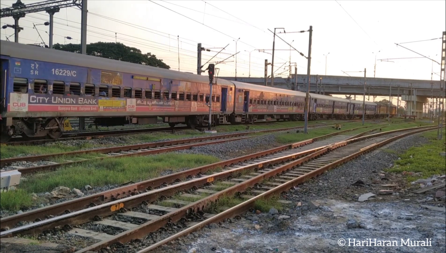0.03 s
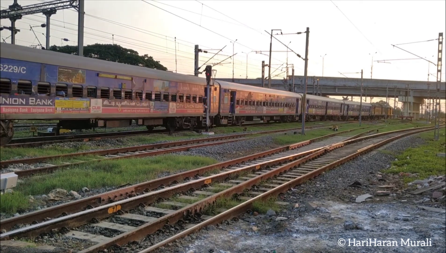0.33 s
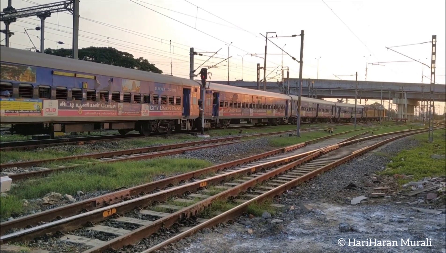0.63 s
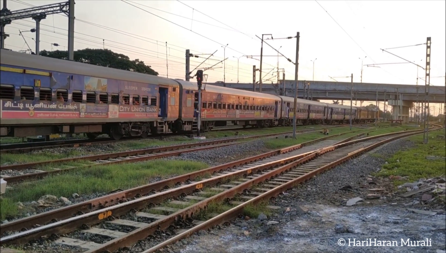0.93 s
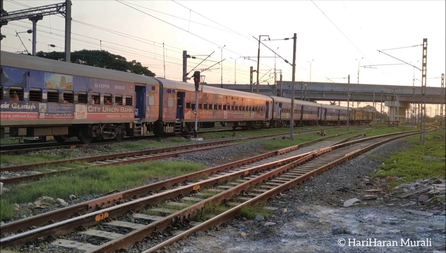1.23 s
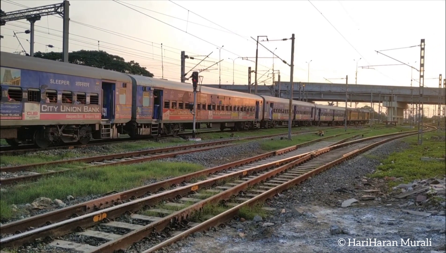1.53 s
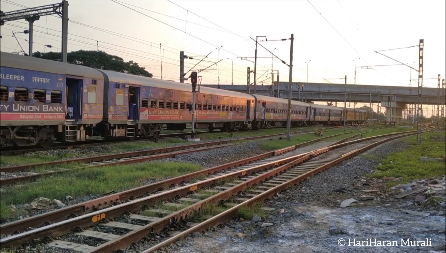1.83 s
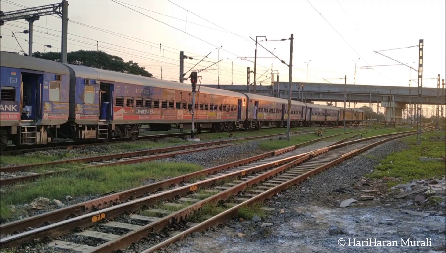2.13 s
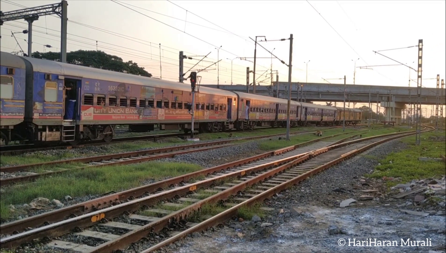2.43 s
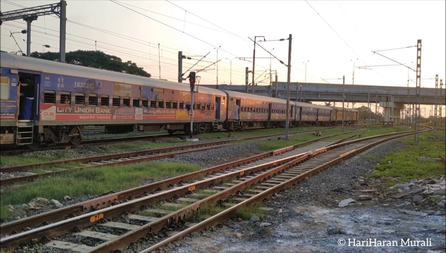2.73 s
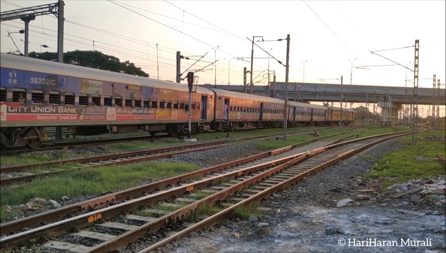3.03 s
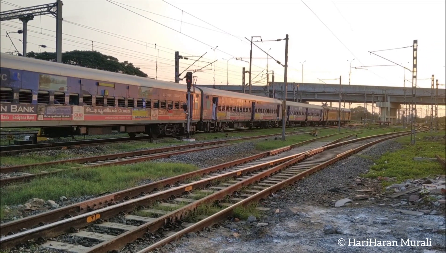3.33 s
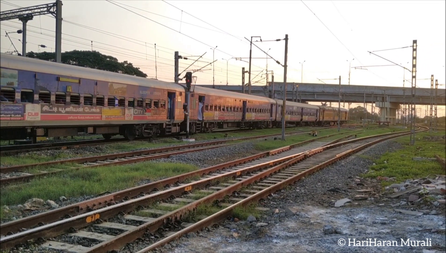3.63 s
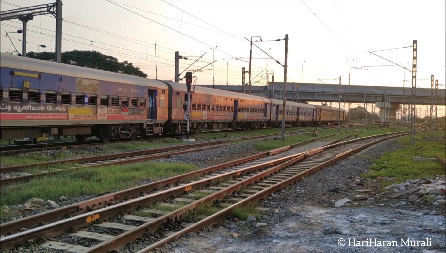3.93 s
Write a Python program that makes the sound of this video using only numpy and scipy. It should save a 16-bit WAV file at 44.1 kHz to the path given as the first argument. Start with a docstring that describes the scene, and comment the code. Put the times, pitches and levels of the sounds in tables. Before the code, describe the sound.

Train coaches rumble slowly through curved track outdoors, close by and slightly left. Irregular ringing clacks and short steel scrapes run through the low rolling noise, while a thin wheel squeal swells and fades three times.

```python
"""In a rail yard, passenger coaches roll slowly through curved points, a few metres to the left. The bogies
(the wheeled frames under each coach) rumble, and the coach bodies boom. Wheels clack over the rail joints and
strike the crossings of the points, which sets their steel ringing. As each bogie passes, its flanges (the
wheels' guiding lips) grind on the rail, and single wheel modes (the notes a wheel naturally rings at) swell
into a squeal."""
import sys
import numpy as np
from scipy import signal
from scipy.fft import rfft, irfft
from scipy.io import wavfile
from scipy.ndimage import uniform_filter1d

SR = 44100
rng = np.random.default_rng(int(sys.argv[2]) if len(sys.argv) > 2 else 0)


def pcm_store(signal):
    """Save signal as 16-bit PCM."""
    levels = np.round(np.clip(np.atleast_2d(signal), -1, 1) * 32767)
    wavfile.write(sys.argv[1], SR, levels.astype(np.int16).T)


N = 176400
T, HZ = np.arange(N) / SR, np.fft.rfftfreq(N, 1 / SR)

# How loud the rolling is (time [s], rumble [dB], roar [dB], rim ring [dB])
ROLLING_LEVELS = [(0, -22, -32.5, -28.5), (.25, -28.5, -35.5, -29.5), (.45, -22.5, -32, -34.5),
                  (1.05, -22, -26, -28), (1.24, -25, -32, -35), (1.4, -24, -28.5, -28),
                  (1.85, -25, -29, -28), (2.1, -23, -30.5, -34), (2.28, -29.5, -36, -41.5),
                  (2.55, -28, -30, -31.5), (2.85, -26.5, -31.5, -34), (3.03, -22.5, -29, -29),
                  (3.15, -25.5, -34.5, -42.5), (3.42, -24, -33.5, -32.5), (3.56, -24, -34.5, -38),
                  (3.68, -22.5, -30, -32.5), (4, -25.5, -32, -32.5)]
# Tone colour of the bogies' rumble (frequency [Hz], level [dB])
RUMBLE_COLOUR = [(10, -11), (30, 2), (45, -2), (75, -1), (120, -3), (180, -6), (245, -2.5), (320, -11.5),
                 (500, -18.5), (1500, -47)]
# Tone colour of the rails' roar (frequency [Hz], level [dB])
ROAR_COLOUR = [(100, -35), (350, -3), (600, -5.5), (950, -3.5), (1400, -9.5), (1560, -5), (2000, -18),
               (3300, -7), (4200, -15), (6000, -20), (12000, -28.5), (16000, -55)]
# Notes of a wheel rim (frequency [Hz], width [Hz], rolling [dB], struck [dB], time to fade 60 dB [s])
RIM_MODES = [(1782, 101, -0.5, -10, 0.28), (2120, 76, -5.5, -9.5, .22), (2345, 100, -4, -6, 0.59),
             (2601, 76, -5.5, -5, 0.19)]
# Coach bodies resonating (peak time [s], half length [s], frequency [Hz], width [Hz], level [dB])
BODY_BOOMS = [(1.37, 0.24, 30, 6.9, -25.5), (.58, 0.25, 261, 31, -26), (.8, 0.24, 350, 90, -34),
              (.993, 0.011, 235, 13.5, -14), (1.567, 0.12, 243, 23, -31.5), (3.355, 0.016, 198, 22, -20)]
# Wheels hitting rail joints and the crossings of the points (time [s], thud [dB], clatter [dB], ring [dB], rise
# [s], leading note [Hz])
WHEEL_HITS = [(.308, -17.5, -26.5, -27, 0.0034, 2200), (.325, -38, -32, -21.5, .012, 2355),
              (.56, -25, -28.5, -39, .0044, 2330), (.576, -22.5, -21.5, -28, .001, 1825),
              (.725, -22.5, -23.5, -18.5, .0011, 2600), (.795, -21.5, -39, -31, .0042, 2370),
              (.883, -21, -26.5, -27, 0.0065, 2200), (.975, -21.5, -24, -36, 0.0072, 1830),
              (1.046, -22, -24.5, -22, 0.00092, 2611), (1.125, -20, -26, -34, 0.0085, 2340),
              (1.289, -19.5, -25, -29, .0056, 1780), (1.46, -19.5, -28, -29.5, 0.011, 2116),
              (1.705, -20, -26, -37, 0.0095, 1750), (2.118, -21, -23.5, -30, 0.0078, 2340),
              (2.442, -17, -19, -28, .001, 2540), (2.606, -21.5, -23.5, -19.5, 0.0016, 2589),
              (2.772, -19, -34, -35, .004, 2590), (2.929, -24, -25.5, -24, 0.005, 2600),
              (3.342, -21, -33, -33, 0.012, 2120), (3.607, -16.5, -22, -27.5, 0.011, 1785),
              (3.771, -18.5, -22.5, -19.5, .001, 2643), (3.84, -18.5, -33, -41, 0.007, 2340),
              (3.925, -18.5, -23, -35, .016, 2100), (3.957, -24, -24, -24, .008, 2310)]
# Tone colour of a hit's low thud (frequency [Hz], level [dB])
THUD_COLOUR = [(25, -3.5), (70, 0.5), (130, -2), (220, 0), (300, -11.5), (450, -25), (1200, -54)]
# Tone colour of a hit's clatter (frequency [Hz], level [dB])
CLATTER_COLOUR = [(120, -26), (330, 3), (550, -2.5), (900, -3), (1400, -10), (2400, -14), (3800, -13.5),
                  (6000, -23.5), (15000, -40)]
# Hollow knock of the bogie frame (frequency [Hz], level [dB], time to fade 60 dB [s])
FRAME_MODES = [(356, -3.5, .09), (451, -4.5, 0.064), (600, -2.5, 0.053), (686, -4, 0.073),
               (934, -11, 0.053)]
# Grinding as the flanges press on the rail (time [s], level [dB])
GRIND_LEVELS = [(0, -18.5), (.29, -21), (.53, -35), (.7, -40.5), (.95, -34), (1.21, -31), (1.44, -22),
                (1.85, -20.5), (2.08, -30.5), (2.33, -42.5), (2.45, -40), (2.62, -29), (2.78, -28.5),
                (2.96, -25), (3.2, -39), (3.55, -48.5), (4, -48)]
# Tone colour of the grinding (frequency [Hz], level [dB])
GRINDING_COLOUR = [(1500, -11.5), (3000, -5.5), (3560, 2), (4540, 1.5), (5400, 1), (6500, 3), (7500, 0.5),
                   (9500, 0), (11500, -1), (12750, 3), (14000, -5), (15500, -11)]
# Quiet notches in the grinding's treble (frequency [Hz], width [Hz], depth [dB])
GRIND_NOTCHES = [(3080, 230, -1), (4183, 250, -20), (4930, 236, -18), (5830, 156, -21), (8080, 220, -16),
                 (13400, 200, -5)]
# Brief flange scrapes as the bogies jolt (peak time [s], half length [s], level [dB])
FLANGE_SCRAPES = [(0.598, 0.029, -29.5), (0.735, .02, -33), (0.8, .03, -32.5), (0.935, 0.028, -26.5),
                  (1.053, .025, -30), (1.163, 0.023, -24), (2.5, 0.046, -32), (2.6, .03, -34),
                  (3.05, 0.031, -27.5), (3.374, .034, -30), (3.444, 0.041, -33.5), (3.642, 0.04, -31.5),
                  (3.849, .027, -31.5), (3.978, .037, -29.5)]
# Tone colour of a scrape (frequency [Hz], level [dB])
SCRAPE_COLOUR = [(1200, -20), (2800, 7), (4800, -5), (6500, 2), (9800, -1.5), (11500, -10), (13000, -11),
                 (15500, -22)]
# Low rim modes singing (peak time [s], half length [s], frequency [Hz], width [Hz], level [dB])
RIM_SINGING = [(.6, 0.3, 2337, 41, -33.5), (1.55, .055, 2116, 21, -30), (1.87, 0.049, 2116, 25, -29.5),
               (2.42, 0.12, 2540, 50, -38), (3.62, 0.22, 2100, 25, -34.5), (2.92, .05, 1770, 50, -30),
               (3.8, 0.038, 2342, 18, -26.5)]
# High wheel modes squealing (peak time [s], half length [s], frequency [Hz], width [Hz], level [dB])
WHEEL_SQUEALS = [(.14, 0.21, 4530, 66, -25), (0.056, 0.13, 5459, 31, -33.5), (0.1, 0.16, 6557, 13, -28),
                 (0.19, .15, 6350, 70, -34), (0.16, .18, 7500, 40, -38), (0.14, .21, 9464, 16, -31.5),
                 (1.71, .21, 5555, 5.3, -27), (1.78, 0.21, 5490, 49, -29.5), (1.927, 0.17, 6412, 7, -24.5),
                 (1.77, 0.22, 6494, 17, -27.5), (1.75, .2, 4565, 50, -36), (1.63, 0.21, 9426, 15, -31.5),
                 (1.83, 0.23, 10411, 8.7, -35), (1.67, 0.21, 10697, 8, -34), (1.65, .22, 10621, 12, -32.5),
                 (2.95, 0.065, 4570, 49, -33.5), (3.1, .045, 4490, 39, -28.5), (3.08, 0.048, 5426, 39, -31)]
# How alike the two microphones sound (frequency [Hz], likeness [about 1 = same])
MIC_LIKENESS = [(250, 1.16), (500, 0.7), (1000, 0.49), (2400, 0.54), (5000, 0.49), (9000, 0.02)]
# How much louder the left microphone is (frequency [Hz], level [dB])
LEFT_BOOST = [(50, -.5), (1200, 1), (2600, -1), (5400, 4.5), (6200, 3), (7100, 7), (8000, 3.5),
              (10300, 6.5), (11300, 4), (15000, -2)]
# How far the left microphone's wave lags (frequency [Hz], phase [radians])
LEFT_PHASE_LAG = [(40, 0), (450, 0.56), (1100, 1.84), (1400, 3.5), (2150, 6), (2650, 6.5), (4550, 12.5),
                  (5550, 19), (6250, 19), (8100, 28), (10700, 31.5)]

PATCH_DB, PATCH_HZ, PATCH_S = 3, 400, .05  # depth, width and length of the contact patches
JOLT_DB, JOLT_HZ = 1, 22
FLUTTER_DB, FLUTTER_HZ = 2.5, 25
CHATTER_DB, CHATTER_HZ = 0.97, 45
LEAD_DB, LEAD_T60_S = -1, .52  # a hit's leading note; T60 is the time to fade by 60 dB
KNOCK_FROM_DB, KNOCK_GROWTH = -22, 1.5  # knock matches clatter here, and changes 1.5 dB per dB of it
SLIP_LIMIT = 0.67  # a driven mode starts to level off at this share of its average strength


def amp(db):
    """Turns decibels into a gain to multiply by."""
    return np.exp(np.asarray(db) * (np.log(10) / 20))


def unit(x):
    """Scales a signal to an average strength (rms) of 1."""
    return x / np.sqrt(np.mean(abs(x) ** 2) + 1e-20)


def curve(points):
    """Joins a table's points into a value for every frequency."""
    hz, value = np.transpose(points)
    return np.interp(np.log(HZ + 1), np.log(hz + 1), value)


def level(table, column=1):
    """Gain over time from one dB column."""
    rows = np.array(table)
    return amp(np.interp(T, rows[:, 0], rows[:, column]))


def wobble(depth_db, rate_hz):
    """A gain that drifts smoothly up and down at random."""
    drift = irfft(rfft(rng.standard_normal(N)) / (1 + (HZ / rate_hz) ** 2), N)
    return amp(depth_db * unit(drift))


def hump(hz, width_hz):
    """A resonance: lets through the frequencies near one note."""
    return 1 / (1 + ((HZ - hz) / (np.pi / 4 * width_hz)) ** 2)


def swell(peak_s, half_s, rise_share=1):
    """A rounded rise and fall, 5 dB down one half length after the peak."""
    away = np.maximum((peak_s - T) / rise_share, T - peak_s) / half_s
    return np.where(away < 4, amp(-5 * away ** 2.12), 0)


def stereo_spectrum():
    """Spectrum of white noise as the two microphones hear it."""
    shared, separate = rfft(rng.standard_normal((2, N)))
    likeness = np.clip(curve(MIC_LIKENESS), 0, .985)
    side = amp(curve(LEFT_BOOST) / 2)
    left = shared * side * np.exp(-1j * curve(LEFT_PHASE_LAG))
    right = (likeness * shared + np.sqrt(1 - likeness ** 2) * separate) / side
    return np.array([left, right])


def noise(gains):
    """Stereo noise shaped by a gain for each frequency."""
    return unit(irfft(stereo_spectrum() * gains, N))


def coloured(colour):
    """Stereo noise with the tone colour of a table."""
    return noise(amp(curve(colour)))


def patchy(sound):
    """Uneven contact makes patches of the spectrum come and go."""
    spectra = signal.stft(sound, nperseg=512)[2]
    frames, bins = round(PATCH_S * SR / 256), round(PATCH_HZ * 512 / SR)
    patches = uniform_filter1d(rng.standard_normal(spectra.shape[1:]), bins, 0)
    patches = unit(uniform_filter1d(patches, frames, 1))
    return unit(signal.istft(spectra * amp(PATCH_DB * patches))[1][:, :N])


def resonances(table):
    """Single modes swell while driven, level off, and flutter with the uneven contact."""
    out, drive = np.zeros((2, N)), stereo_spectrum()
    for peak_s, half_s, hz, width, db in table:
        mode = unit(np.fft.ifft(drive * hump(hz, width), N))
        power = np.mean(abs(mode) ** 2, axis=0)
        tone = mode.real / np.sqrt(power + SLIP_LIMIT ** 2) * wobble(FLUTTER_DB, FLUTTER_HZ)
        shape = swell(peak_s, half_s)
        out += amp(db) * np.sqrt(np.mean(shape ** 2)) * unit(shape * tone)
    return out


def rolling():
    """Bogies rumble, rails roar, and each note of the wheel rims flutters on its own."""
    rumble = coloured(RUMBLE_COLOUR) * unit(wobble(JOLT_DB, JOLT_HZ))
    roar = patchy(coloured(ROAR_COLOUR)) * unit(wobble(JOLT_DB, JOLT_HZ))
    rims = sum(amp(db) * noise(hump(hz, width)) * wobble(FLUTTER_DB, 1 / PATCH_S)
               for hz, width, db, _, _ in RIM_MODES)
    return (rumble * level(ROLLING_LEVELS, column=1)
            + roar * level(ROLLING_LEVELS, column=2)
            + unit(rims) * level(ROLLING_LEVELS, column=3))


def booming():
    """The coach bodies resonate with low notes."""
    return resonances(BODY_BOOMS)


def hit_levels(column, t60_s, hold_s=0.014):
    """Gain over time for all the wheel hits: each rises, holds and fades."""
    power = np.zeros(N)
    for hit in WHEEL_HITS:
        first, rise_s = round(hit[0] * SR), hit[4]
        t = T[:min(SR // 2, N - first)]
        fade_db = 60 * np.maximum(t - rise_s - hold_s, 0) / t60_s
        power[first:first + len(t)] += (amp(hit[column] - fade_db) * np.minimum(t / rise_s, 1)) ** 2
    return np.sqrt(power)


def clacks():
    """Each rail joint or crossing sends a thud and a clatter through the bogie and a noisy clank through the
    wheel."""
    thud = coloured(THUD_COLOUR) * hit_levels(column=1, t60_s=0.16)
    clatter = patchy(coloured(CLATTER_COLOUR)) * hit_levels(column=2, t60_s=0.19)
    crack = amp(-10.5) * hump(2500, width_hz=2400)
    rim_bands = sum(amp(db) * hump(hz, 2 * width) for hz, width, _, db, _ in RIM_MODES)
    clank = amp(-1.5) * noise(crack + rim_bands) * hit_levels(column=3, t60_s=0.11, hold_s=0.007)
    return thud + clatter + clank


def ringing():
    """Each hit knocks the bogie frame and rings the wheel, where one long note leads."""
    out = np.zeros((2, N))
    for start_s, _, clatter_db, ring_db, rise_s, lead_hz in WHEEL_HITS:
        first = round(start_s * SR)
        t = T[:min(SR // 2, N - first)]
        attack = np.minimum(t / rise_s, 1)
        knock_db = KNOCK_FROM_DB + KNOCK_GROWTH * (clatter_db - KNOCK_FROM_DB)
        modes = [(lead_hz, ring_db + LEAD_DB, LEAD_T60_S)]
        modes += [(hz, ring_db + db, t60) for hz, _, _, db, t60 in RIM_MODES]
        modes += [(hz, knock_db + db, t60) for hz, db, t60 in FRAME_MODES]
        for hz, db, t60 in modes:
            phase = 2 * np.pi * (hz * t + rng.random()) + rng.random((2, 1))  # shifted in each channel
            out[:, first:first + len(t)] += amp(db - 60 * t / t60) * attack * np.sin(phase)
    return out


def grinding():
    """Flanges chatter along the rail and stir up clusters of closely spaced wheel modes."""
    gaps_db = sum(db * np.exp(-2 * ((HZ - hz) / width) ** 2) for hz, width, db in GRIND_NOTCHES)
    peaks_db = sum(3 * unit(uniform_filter1d(rng.standard_normal(len(HZ)), round(width_hz * N / SR)))
                   for width_hz in (16, 91))  # fine peaks, then wider clusters
    grind = patchy(noise(amp(curve(GRINDING_COLOUR) + gaps_db + peaks_db)))
    return grind * unit(wobble(CHATTER_DB, CHATTER_HZ)) * level(GRIND_LEVELS)


def scrapes():
    """Steel slides on steel in short hisses that rise faster than they fall."""
    power = sum((amp(db) * swell(peak_s, half_s, rise_share=0.72)) ** 2
                for peak_s, half_s, db in FLANGE_SCRAPES)
    return patchy(coloured(SCRAPE_COLOUR)) * np.sqrt(power)


def squealing():
    """On the curve, rubbing flanges make high wheel modes squeal and lower ones sing."""
    return resonances(WHEEL_SQUEALS) + resonances(RIM_SINGING)


def scene():
    """Adds up all the sounds of the train."""
    return rolling() + clacks() + ringing() + grinding() + scrapes() + squealing() + booming()


def record(dry):
    """Cuts away the very highest treble."""
    lowpass = signal.firwin(801, cutoff=15750, window=("kaiser", 9), fs=SR)
    return signal.oaconvolve(dry, lowpass[None], "same")


dry = scene()
out = record(dry)
pcm_store(out)
```